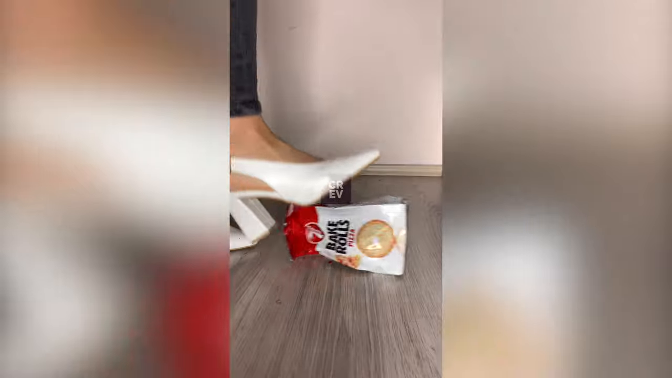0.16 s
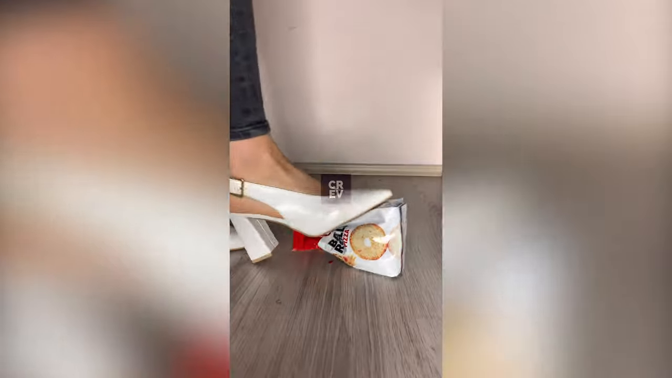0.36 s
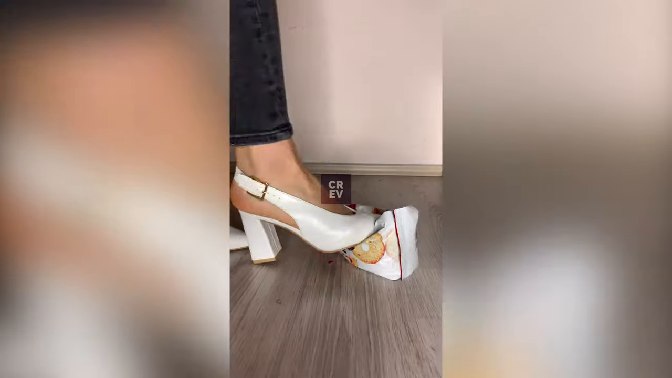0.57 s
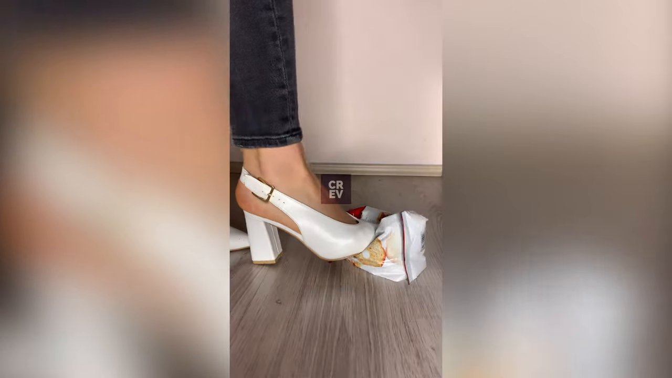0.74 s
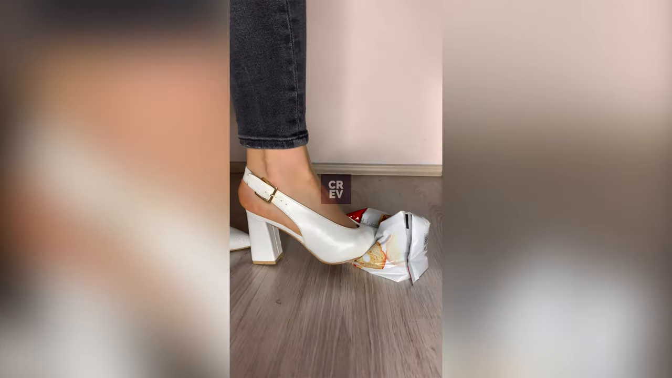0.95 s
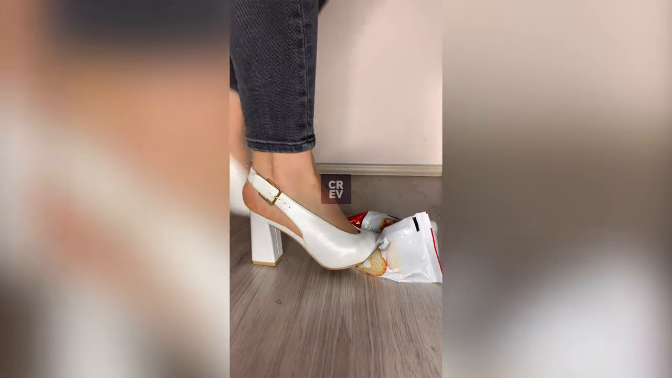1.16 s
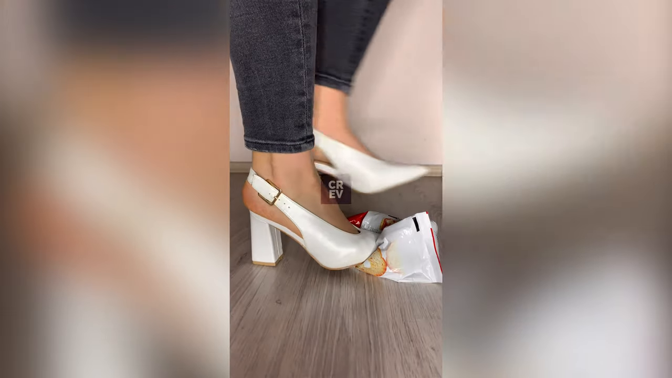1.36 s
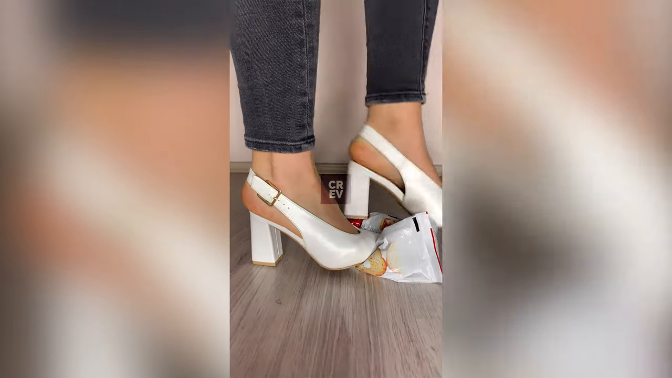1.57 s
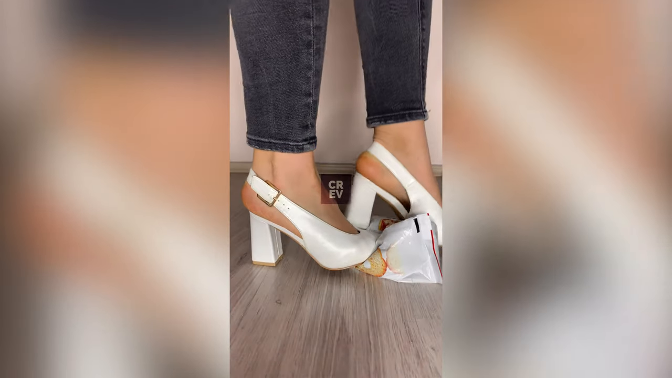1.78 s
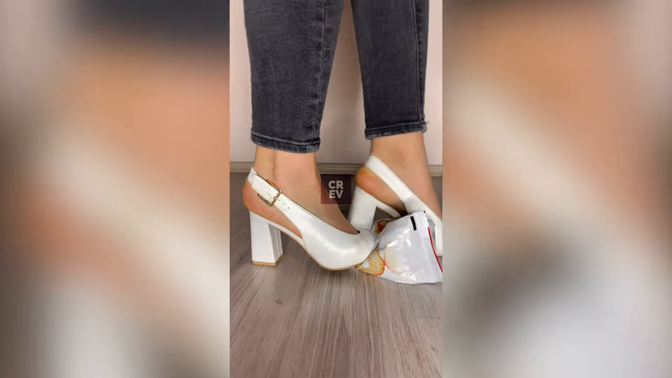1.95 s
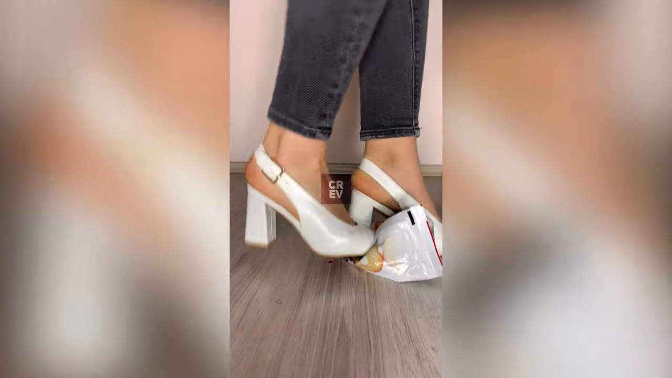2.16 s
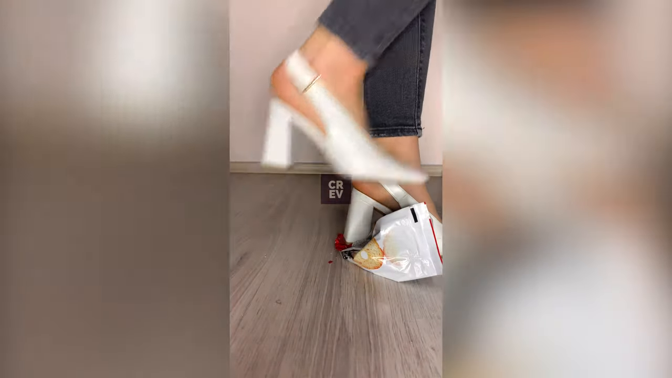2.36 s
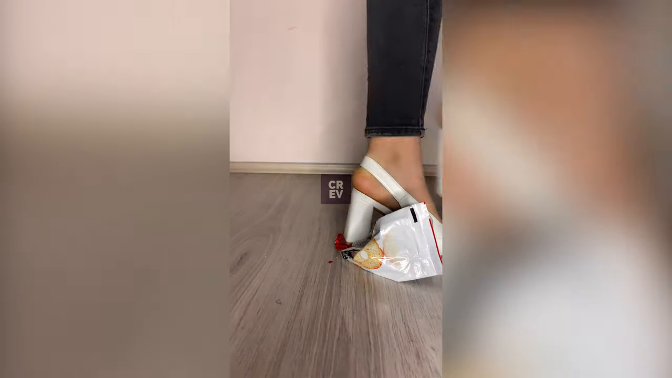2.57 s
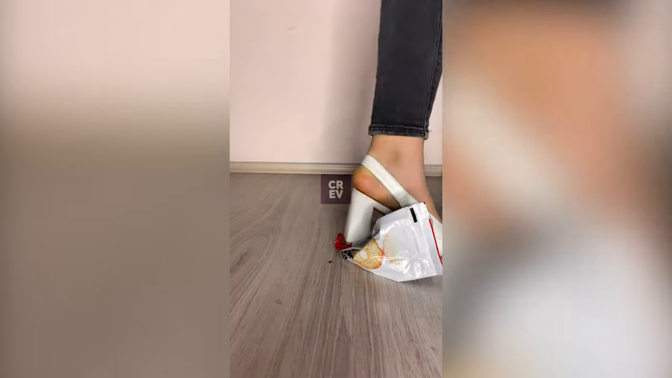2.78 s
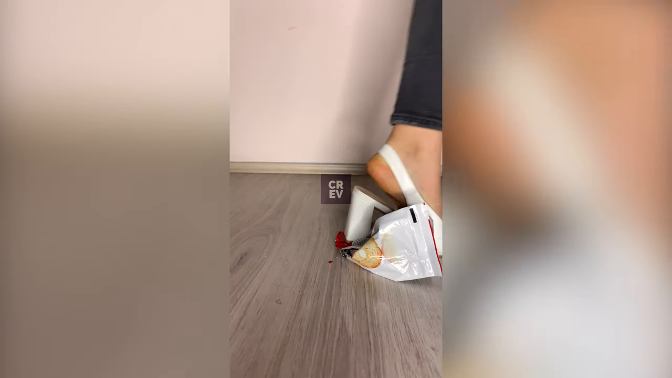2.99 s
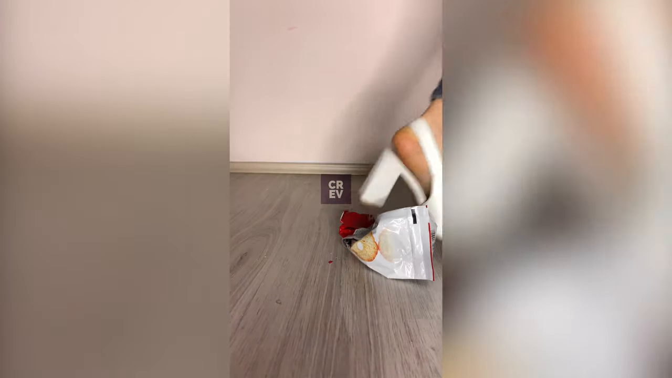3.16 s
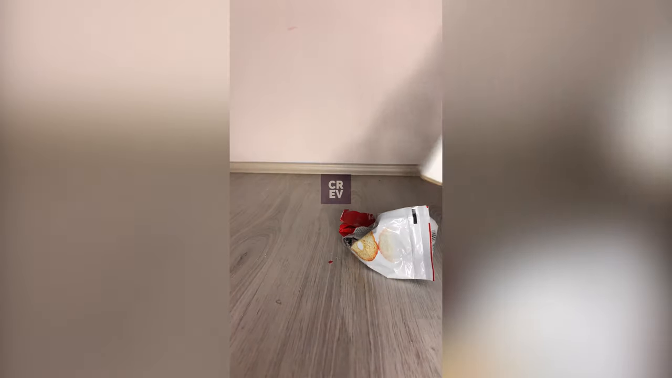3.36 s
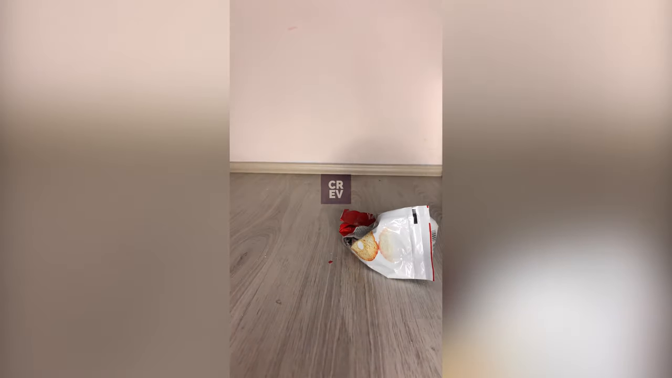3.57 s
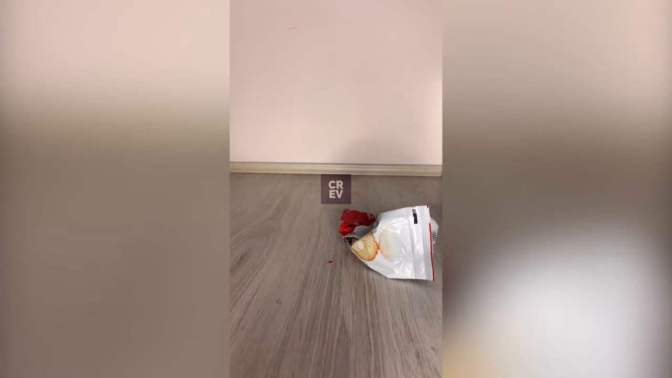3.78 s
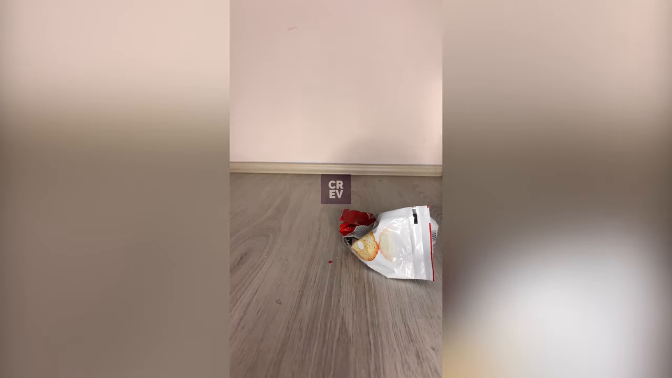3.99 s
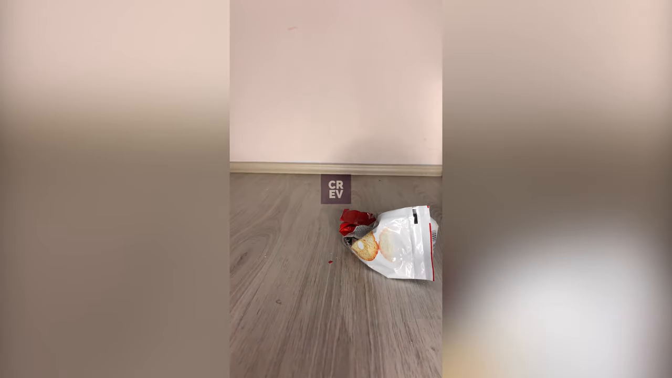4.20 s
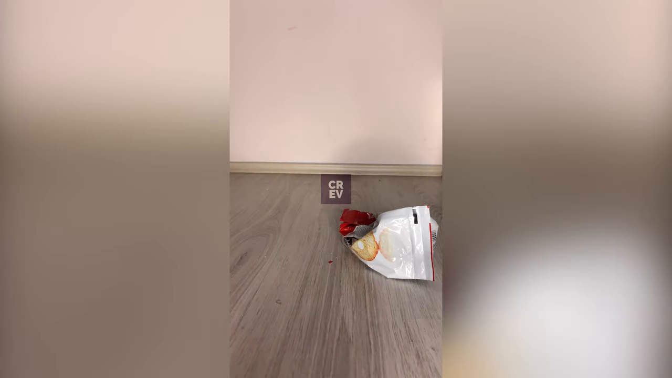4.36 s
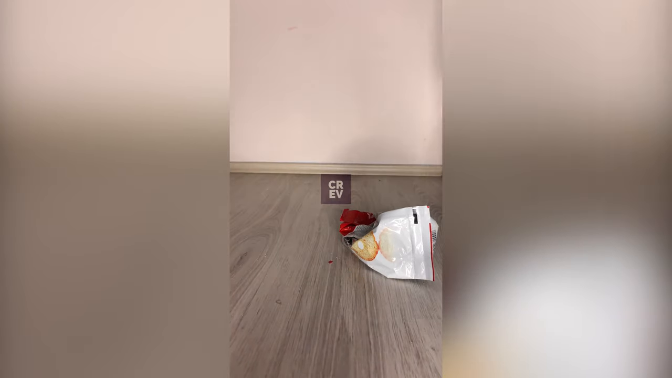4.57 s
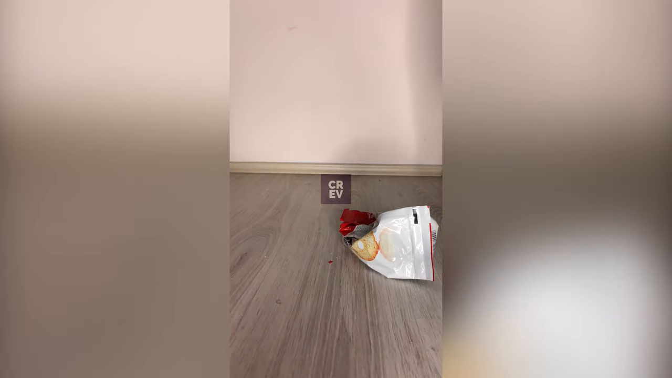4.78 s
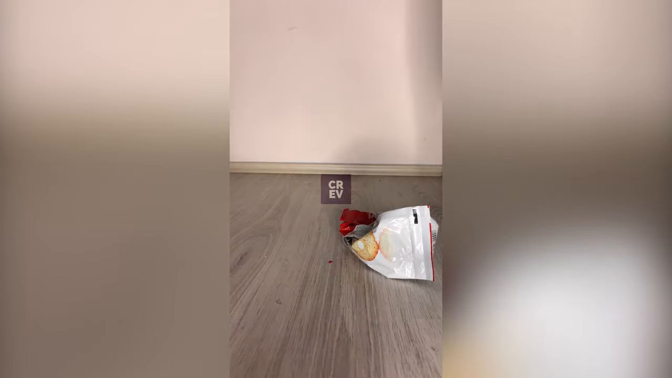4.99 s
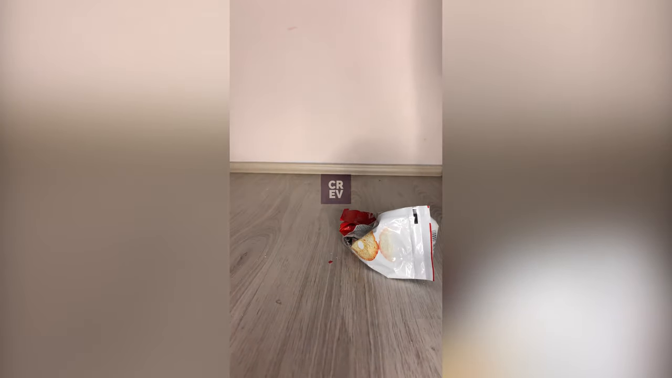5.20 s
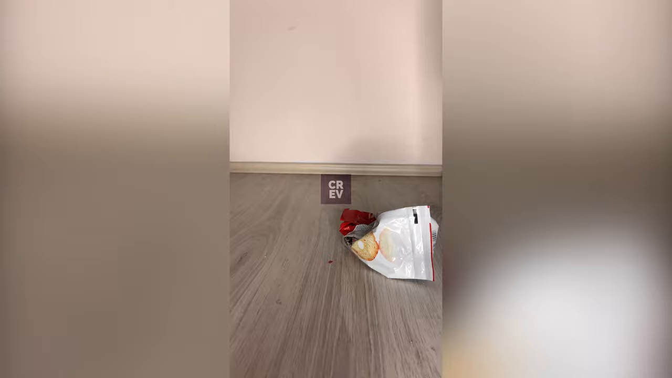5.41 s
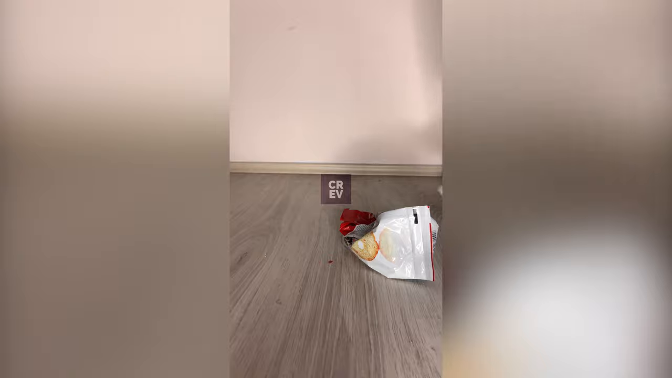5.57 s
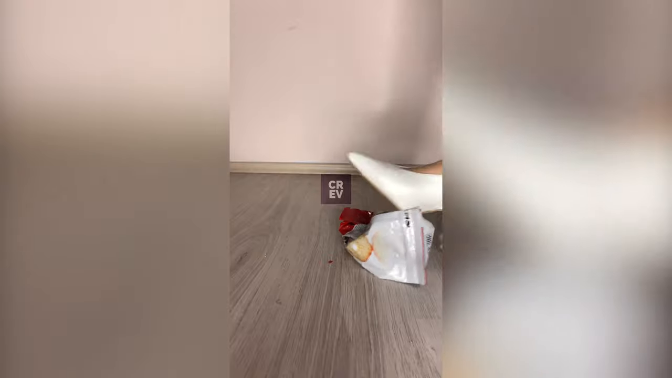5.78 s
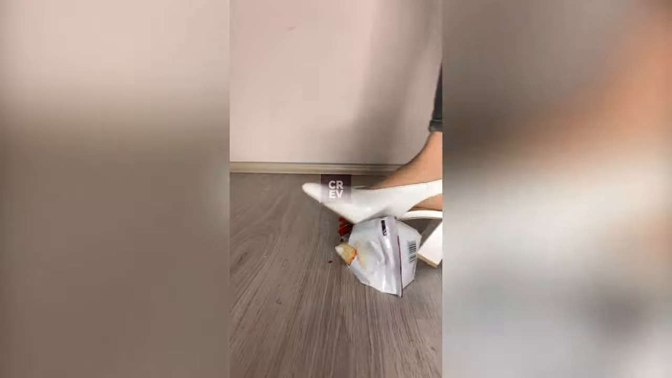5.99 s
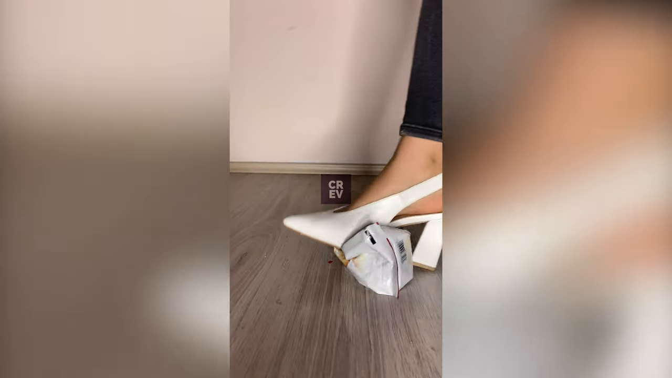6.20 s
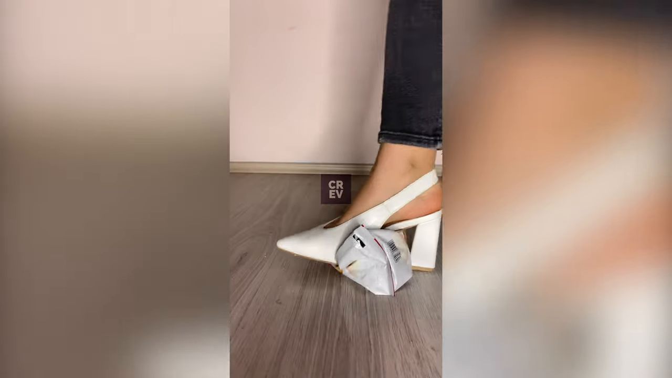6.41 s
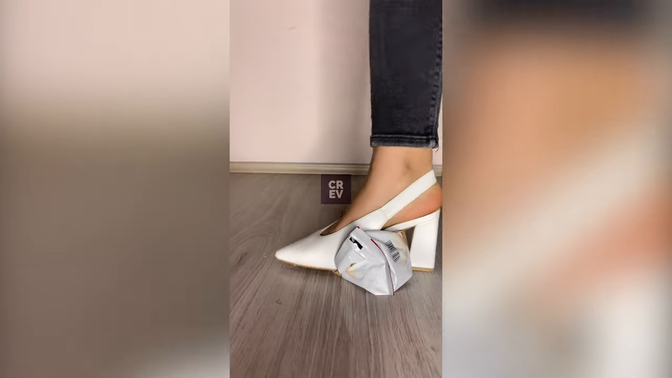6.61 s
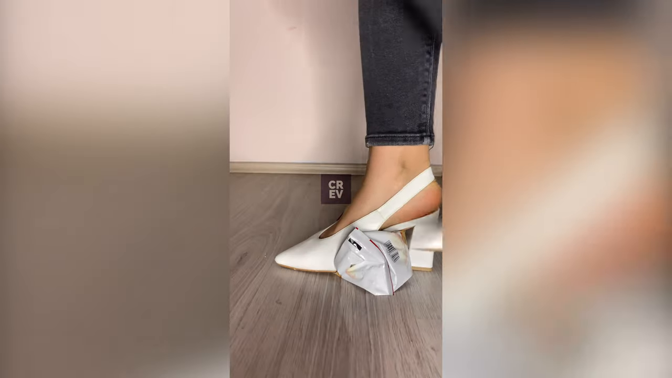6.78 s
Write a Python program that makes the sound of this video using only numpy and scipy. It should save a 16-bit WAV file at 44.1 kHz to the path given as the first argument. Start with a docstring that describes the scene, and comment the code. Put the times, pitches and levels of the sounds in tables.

```python
"""Treading on a bag of crisp bread

Block-heeled shoes tread a foil-lined bag of crisp bread slices on a laminate floor in a small room.
Film and bread crackle as clustered grains, slices snap as noise bursts, heels knock as falling tones.
Between treads the bag unfolds with lone ticks while steps walk off and back.
Reverberation, floor rumble, room noise and a faint hum lie under it; a stereo filter widens the image."""
import sys
import numpy as np
from scipy import signal
from scipy.fft import rfft, irfft, next_fast_len
from scipy.io import wavfile
from scipy.ndimage import uniform_filter1d

SR = 44100
rng = np.random.default_rng(int(sys.argv[2]) if len(sys.argv) > 2 else 0)


def field_ratio(decibels):
    """Amplitude ratio for a level in dB (20 dB per decade); scalars and array-likes work."""
    return 10 ** (np.asarray(decibels, dtype=float) / 20)


def bounce(signal):
    """Save signal as a 16-bit WAV file at the path given by the first command-line argument."""
    frames = np.transpose(np.atleast_2d(signal))
    limited = np.clip(frames, -1, 1)
    pcm = np.round(limited * 32767).astype(np.int16)
    wavfile.write(sys.argv[1], SR, pcm)


N = 302059

# three treads, each (time [s], film crackle [dB], crumbling before the trim in crumbs() [dB re crackle])
TREADS = [
    [(0.086, -63, 7), (0.098, -37, 3), (0.122, -35, 13), (0.166, -35.5, 5.5), (0.222, -42, 13.5),
     (0.23, -27, -0.5), (0.242, -18.5, 3.5), (0.278, -27.5, 6.5), (0.362, -25, 12), (0.378, -27.5, -6),
     (0.63, -21.5, 5), (0.72, -26.5, 7), (0.746, -21.5, 5), (0.894, -34, -1), (0.93, -19, -4.5),
     (1.014, -23, -1), (1.03, -16, -0.5), (1.09, -45, 0.5)],
    [(1.64, -53, 9.5), (1.65, -36, -13), (1.666, -32, 3.5), (1.696, -41.5, 6.5), (1.704, -29, 3),
     (1.792, -21.5, 0), (1.814, -25, -1), (1.968, -21.5, -1), (1.98, -20.5, 7), (1.994, -36, 2),
     (2.012, -33, 3.5), (2.14, -41.5, 2), (2.166, -31, 2.5), (2.176, -36.5, 3), (2.266, -40.5, -3),
     (2.272, -33.5, -7), (2.288, -39, -2), (2.37, -55, 1)],
    [(5.78, -54.5, -7), (5.794, -34, -1), (5.812, -28.5, 0.5), (5.874, -46.5, 1.5), (5.89, -33.5, 4),
     (5.984, -52, 13.5), (6.012, -35.5, 8), (6.092, -50.5, 9), (6.11, -35.5, 8), (6.144, -37.5, 3.5),
     (6.41, -27, 4), (6.52, -36, 1), (6.576, -22, -1.5), (6.69, -31.5, -2), (6.698, -27, 2.5),
     (6.772, -38, -10), (6.784, -35, 2.5), (6.849, -40, -4.5)],
]
# load on the boards, one per tread [dB re untrimmed crumbling]
TREAD_WEIGHT_DB = [-13, -24.5, -15.5]
# treble of the crackle, one per tread [dB re crackle]
TREAD_TREBLE_DB = [-1.5, -1, 1.5]
# bag unfolding between treads, in three stretches: (time [s], film crackle [dB])
UNFOLD = [
    [(1.09, -37), (1.276, -46), (1.348, -55.5), (1.534, -56), (1.64, -51)],
    [(2.37, -59), (2.486, -72.5), (2.684, -71.5), (3.198, -56.5), (3.578, -62.5), (3.73, -80)],
    [(3.73, -57.5), (3.912, -66), (4.408, -69), (4.518, -84.5), (4.786, -64), (5.1, -88)],
]
# treble of the crackle, one per stretch [dB re crackle]
UNFOLD_TREBLE_DB = [-1.5, 0.5, -9.5]
# creases and slices snapping, and dull ticks of steps:
# (time [s], level [dB], treble rms [dB re level], body rms [dB re level], body pitch [Hz])
SNAPS = [(0.101, -15.5, -8.5, -9.5, 810), (0.108, -25.5, -8, -3.5, 810), (0.1278, -18.5, -12, 1, 1070),
         (0.1549, -12.5, -13, -6.5, 1080), (0.2389, 5.5, -9.5, -15.5, 1670), (0.3192, -2, -10, -14, 1460),
         (0.3465, 2.5, -10, -14, 1080), (0.4365, 1, -13.5, -18.5, 1870), (0.4816, -5.5, -7, -14, 1070),
         (0.5207, 0.5, -6.5, -18.5, 1900), (0.5611, 1, -8, -14.5, 674), (0.599, -8.5, -6, -15.5, 931),
         (0.6125, -2.5, -7, -11, 1020), (0.6474, -2.5, -9.5, -12, 1500), (0.6624, -4.5, -10.5, -8.5, 1390),
         (0.7472, 0.5, -9, -11.5, 810), (0.797, -5.5, -12.5, -7.5, 1590), (0.8349, -13, -7.5, -12.5, 1380),
         (0.8506, -12, -9, -11, 690), (0.9113, -8.5, -12, -8.5, 670), (0.9293, -7.5, -13.5, -11.5, 1800),
         (1.0025, -8.5, -15.5, -12.5, 1480), (1.0288, 5, -11.5, -10, 1540), (1.0514, -6.5, -12, -8.5, 1760),
         (1.1497, -23.5, -9, -8, 656), (1.267, -21, -13, -14.5, 1850), (1.287, -26, -16.5, -11, 950),
         (1.3269, -24.5, -8.5, -18.5, 1940), (1.3975, -23, -16, -16, 2030), (1.4209, -28, -12, -17, 1710),
         (1.4424, -37, -13, -10, 2090), (1.483, -24, -10.5, -22, 1470), (1.506, -24.5, -13.5, -18.5, 1480),
         (1.5323, -20.5, -11.5, -13.5, 770), (1.5942, -16, -19.5, -15.5, 1750),
         (1.6329, -37.5, -1.5, -3.5, 1680), (1.65, -17.5, -4.5, -12.5, 1410), (1.6697, -6, -7.5, -18, 1060),
         (1.7064, -8, -7, -20.5, 1170), (1.728, -7, -8, -12.5, 1170), (1.7562, -1, -11.5, -13.5, 1750),
         (1.7719, 0, -11, -16.5, 1210), (1.8777, -2, -9, -22.5, 1380), (1.922, -11.5, -10, -7, 1730),
         (1.9799, -4.5, -12.5, 2, 650), (2.0911, -23, -7.5, -13.5, 690), (2.1628, -7.5, -9, -14.5, 1010),
         (2.236, -20, -10.5, -12, 673), (2.2737, -15, -11.5, -18, 1010), (2.3193, -21, -9.5, -11, 1000),
         (2.3968, -19, -8, -11.5, 1400), (2.4603, -37.5, -5.5, -6.5, 781), (2.4823, -32, -9.5, -11, 1000),
         (2.576, -36.5, -7, -16.5, 740), (2.6019, -35, -6.5, -25.5, 1410), (2.6419, -25, -10.5, -15, 2050),
         (2.709, -43.5, -7.5, -4.5, 1510), (2.7814, -18, -17.5, -14.5, 2190),
         (2.9247, -27.5, -7, -4.5, 1160), (2.9362, -13.5, -13.5, -8, 1800), (2.9578, -28.5, -14.5, -2, 598),
         (3.0106, -30, -6, -17, 1430), (3.038, -17.5, -13.5, -19, 1510), (3.0846, -23.5, -12, -7.5, 1030),
         (3.1181, -14, -10, -15.5, 1420), (3.215, -23.5, -11.5, -20, 1450), (3.2928, -11, -16, -19.5, 1810),
         (3.3379, -23, -11.5, -18.5, 1920), (3.357, -24.5, -12, -9, 1380),
         (3.4921, -26, -11.5, -18.5, 1500), (3.5301, -23, -16, -12.5, 1780), (3.5397, -30, -11, -4.5, 1670),
         (3.6385, -26, -11, -14, 1820), (3.7436, -14.5, -28, -5, 646), (3.8812, -27.5, -20, -11.5, 1980),
         (3.9613, -35, -21.5, -3.5, 1430), (3.9762, -35, -14.5, -7, 1830), (4.0927, -47, -13.5, 1, 996),
         (4.1485, -29.5, -20, -9.5, 1800), (4.2182, -41, -22.5, 0.5, 950),
         (4.2857, -37.5, -22.5, 0.5, 1810), (4.3094, -22.5, -22, -9, 660), (4.4559, -29, -11.5, -6.5, 1010),
         (4.4674, -23, -17.5, -13, 907), (4.556, -36, -19.5, -7.5, 1940), (4.6717, -46, -11, -6, 1030),
         (4.6844, -34.5, -19.5, -10.5, 2000), (4.8019, -18.5, -26, -12.5, 690),
         (5.1155, -36, -14.5, -20.5, 1380), (5.2839, -37.5, -14.5, -0.5, 876), (5.4939, -42, -9, -6, 1200),
         (5.7941, -8, -8.5, -25, 1390), (5.8134, -8.5, -10.5, -12, 1390), (5.8907, -15, -11.5, -12.5, 990),
         (5.9197, -13.5, -13.5, -11, 710), (6.0142, -9.5, -10.5, -23.5, 2060),
         (6.056, -17, -12.5, -5, 1050), (6.0956, -20.5, -0.5, -2.5, 1190), (6.111, -4, -10.5, -19, 1010),
         (6.1265, -12.5, -6.5, -11, 1220), (6.1479, -14.5, -12, -16.5, 2030),
         (6.2242, -11.5, -6, -12.5, 1350), (6.2494, -11.5, -7.5, -12.5, 1000),
         (6.2887, -12, -8, -12.5, 1840), (6.3079, -4, -6.5, -16, 1410), (6.5314, -13.5, -5, -14, 1210),
         (6.559, -6.5, -7, -13.5, 1000), (6.5983, -9.5, -10.5, -13, 650), (6.6367, -10.5, -8, -11.5, 1380),
         (6.699, -7, -9, -15.5, 2040), (6.7104, -4.5, -10, -23, 1080), (6.7872, -4.5, -11, -17, 990),
         (6.8194, -10, -12, -21, 651)]
# heels and soles landing, slices giving way: (time [s], level [dB], nominal pitch [Hz], t60 [s])
KNOCKS = [(0.232, -10.5, 370, 0.023), (0.317, -10, 750, 0.017), (0.333, -4, 482, 0.039),
          (0.556, -10, 431, 0.05), (0.615, -7, 307, 0.035), (0.74, -5.5, 666, 0.028),
          (0.848, -15.5, 465, 0.044), (0.952, -15, 590, 0.021), (1.046, -6, 382, 0.049),
          (1.534, -32.5, 780, 0.053), (1.664, -23.5, 477, 0.035), (1.75, -23.5, 395, 0.035),
          (1.864, -14, 705, 0.028), (2.245, -20.5, 623, 0.056), (2.846, -13.5, 518, 0.039),
          (3.353, -34.5, 168, 0.0345), (3.74, -22, 672, 0.044), (4.228, -42, 261, 0.035),
          (4.338, -23, 333, 0.035), (4.783, -25.5, 366, 0.012), (4.81, -26.5, 255, 0.024),
          (5.23, -38, 319, 0.064), (5.285, -28, 280, 0.0322), (5.357, -26.5, 262, 0.023),
          (5.49, -47.5, 466.4, 0.033), (5.787, -19.5, 334, 0.024), (5.903, -10, 720, 0.03),
          (6.104, -22, 860, 0.024), (6.225, -22.5, 660, 0.037), (6.355, -21.5, 790, 0.05),
          (6.687, -14, 760, 0.018)]
# stamps, and two small short knocks leading into the second one, all as falling sweeps: (time [s], level [dB],
# start of the sweep [Hz], fall time [s], blow on the boards [dB])
STAMPS = [(1.0372, 1, 550, .0042, -22), (1.9715, -7, 700, .002, -40), (1.9770, -1, 700, .002, -36),
          (1.9811, 2, 570, .0040, -23)]
# scuffs of soles, bursts of rustle and low rumbles:
# (start [s], length [s], dull grains before the trim in crumbs() [dB], rumble [dB], crackle [dB])
BURSTS = [(0.0, 0.054, -81, -65.5, -64), (2.546, 0.024, -67.5, -55, -71), (2.83, .17, -45, -41, -54.5),
          (3.035, .18, -38.5, -51, -41.5), (3.354, 0.038, -67, -69, -49), (3.726, .14, -41.5, -47.5, -62),
          (4.212, .09, -54, -49, -63), (4.326, .12, -46, -45.5, -69), (4.448, .08, -55, -57, -58),
          (4.778, 0.067, -40.5, -39.5, -56), (4.878, 0.053, -51, -48.5, -50.5),
          (5.223, 0.056, -50, -50.5, -66.5), (5.292, .12, -44.5, -46, -88),
          (5.451, 0.062, -58, -58.5, -63.5), (5.651, 0.12, -79, -66, -90), (6.547, 0.26, -60, -42.5, -63)]
# modes of the floor and the air above it: (frequency [Hz], level [dB], t60 [s])
BOARDS = [(57, -7, .85), (92, -13, .3), (143, -11, .3), (172, -9, .18), (206, 1, .7), (275, -9, .26),
          (318, -10, .45), (458, -7, .13)]
# spectrum of the film crackle: (frequency [Hz], level [dB])
FILM = [(300, -21), (900, -4.5), (2000, -1.5), (4000, -1.5), (7000, 0), (10000, -1), (13000, -1.5),
        (15500, -2.5), (16300, -31.5)]
# spectrum of breaking bread: (frequency [Hz], level [dB])
CRUMB = [(120, -25), (300, -2), (600, 2.5), (1200, 2), (1900, 3), (2600, -16.5), (5000, -53)]
# body spectrum of a snap pitched at SLICE_HZ: (frequency [Hz], level [dB])
SLICE = [(200, -20), (550, -11.5), (1000, 3), (1500, -11.5), (2600, -13), (5000, -30.5)]
# spectrum of the boards flexing: (frequency [Hz], level [dB])
WEIGHT = [(20, -13.5), (45, -23), (57, -8), (70, 4), (140, 4), (220, 1.5), (320, 4), (600, -36.5)]
# reverberation: (frequency [Hz], t60 [s])
ROOM = [(100, 0.053), (250, 0.28), (700, 0.12), (2000, .2), (5000, 0.2), (12000, 0.15)]
# spectrum of the room noise: (frequency [Hz], level [dB])
QUIET = [(18, -27), (30, 7), (119, 3.5), (439, -26.5), (3690, -29.5), (4990, -37.5), (8030, -21.5),
         (9820, -33.5), (12000, -24.5), (15600, -45), (22000, -120)]
# spectrum of the hum: (frequency [Hz], level [dB])
HUM = [(40, -41), (51, -7), (57, 2.5), (65, -6), (85, -40.5)]
# stereo filter: (frequency [Hz], phase of left ahead of right [rad], channel likeness before widening [0-1])
STEREO = [(0, 0, .99), (250, -.25, .97), (800, -.9, .8), (1500, 0, .9), (2200, 1.4, .65), (2900, 2.8, .2),
          (3800, 2.2, .25), (4800, 3.14, .7), (5800, 4.9, .65), (6600, 6.1, .92), (7500, 6.45, .95),
          (8400, 7.9, .75), (9200, 9.25, .985), (10200, 9.6, .985), (11000, 11, .75), (11800, 12.3, .93),
          (13000, 12.85, .93), (13800, 14.1, .75), (14500, 15.4, .95), (15600, 15.85, .98), (22050, 22, .9)]

TREBLE_HZ, DULL_HZ, SLICE_HZ = 5500, 1200, 1000
UNFOLD_CRUMB_DB = 0.5  # loose crumbs shifting, re crackle, before the trim in crumbs()
FLURRY_DB, FLURRY_T60_S = -33, 0.078  # short run of crackle after each snap, re its level
FLURRY_TREBLE_DB, BURST_TREBLE_DB = -7.5, -1.5  # re their crackle
BURST_RISE_S, BURST_SAG_DB, BURST_RELEASE_DB_PER_S = 0.01, -6, 301.5
THUD_DB, THUD_T60_S = -27.5, 0.77  # rumble after each knock, re its level
STAMP_THUD_DB, STAMP_THUD_T60_S = -30.5, 0.63
FLEX_RING_DB = -7.5  # ringing modes in the rumble
QUIET_DB, HUM_DB = -75, -71


def evened(x):
    """Scales to rms 1."""
    return x / np.sqrt(np.mean(x ** 2) + 1e-20)


def read(points, hz):
    """Reads a spectrum table on a log frequency axis."""
    f, value = np.transpose(points)
    return np.interp(np.log(hz + 1), np.log(f + 1), value)


def colour(x, points):
    """Filters by a spectrum table."""
    gain = field_ratio(read(points, np.fft.rfftfreq(len(x), 1 / SR)))
    return irfft(rfft(x) * gain, len(x))


def split(x, hz):
    """Parts below and above hz."""
    low = signal.sosfilt(signal.butter(4, hz, fs=SR, output="sos"), x)
    high = signal.sosfilt(signal.butter(4, hz, "high", fs=SR, output="sos"), x)
    return low, high


def add(mix, s, sound):
    """Mixes a sound in at time s."""
    part = mix[round(s * SR):][:len(sound)]
    part += sound[:len(part)]


def curve(table, column):
    """Power of a control curve, its dB columns summed up to column; silent outside its span."""
    rows = np.array(table)
    db = rows[:, 1:column + 1].sum(1)
    return field_ratio(2 * np.interp(np.arange(N) / SR, rows[:, 0], db, -150, -150))


def aftermath(events, db, t60_s):
    """Power that jumps at each event and dies away exponentially."""
    kicks = np.zeros(N)
    for row in events:
        add(kicks, row[0], field_ratio([2 * (row[1] + db)]))
    return abs(signal.lfilter([1], [1, -field_ratio(-120 / t60_s / SR)], kicks))


def bursts(column):
    """Power of the scuffs, rustles and rumbles: each rises, sags over its length, then lets go."""
    out, t = np.zeros(N), np.arange(SR // 2) / SR
    for row in BURSTS:
        start_s, length_s = row[:2]
        sag_db = BURST_SAG_DB * np.minimum(t / length_s, 1)
        release_db = BURST_RELEASE_DB_PER_S * np.maximum(t - length_s, 0)
        rise = np.minimum(t / BURST_RISE_S, 1)
        add(out, start_s, (rise * field_ratio(row[column] + sag_db - release_db)) ** 2)
    return out


def pressure():
    """Gains of crackle, its treble, crumbling and load: powers of all their causes summed."""
    unfolding = [curve(table, column=1) for table in UNFOLD]
    parts = [curve(table, column=1) for table in TREADS] + unfolding
    parts += [aftermath(SNAPS, FLURRY_DB, FLURRY_T60_S), bursts(column=4)]
    treble_db = TREAD_TREBLE_DB + UNFOLD_TREBLE_DB + [FLURRY_TREBLE_DB, BURST_TREBLE_DB]
    treble = sum(field_ratio(2 * db) * power for db, power in zip(treble_db, parts))

    crushed = [curve(table, column=2) for table in TREADS]
    crumbling = sum(crushed) + field_ratio(2 * UNFOLD_CRUMB_DB) * sum(unfolding) + bursts(column=2)

    load = sum(field_ratio(2 * db) * power for db, power in zip(TREAD_WEIGHT_DB, crushed))
    load += bursts(column=3)
    load += aftermath(KNOCKS, THUD_DB, THUD_T60_S)
    load += aftermath(STAMPS, STAMP_THUD_DB, STAMP_THUD_T60_S)
    return np.sqrt([sum(parts), treble, crumbling, load])


def grains(slips, per_s, spread_db, lo_hz, hi_hz, cycles, clump, count=24):
    """Tiny fractures bunched at the slips, each a few dying cycles at its own pitch; a few are large."""
    bunch = np.exp(clump * slips)
    size = field_ratio(spread_db * np.minimum(rng.exponential(1, N), 5)) * rng.choice([-1, 1], N)
    size *= rng.random(N) < per_s / SR * bunch / bunch.mean()
    kind = rng.integers(0, count, N)
    t, out = np.arange(1024) / SR, np.zeros(N)
    for k, hz in enumerate(np.geomspace(lo_hz, hi_hz, count)):
        ring = np.exp(-t * hz / cycles) * np.sin(2 * np.pi * hz * t)
        out += signal.oaconvolve(size * (kind == k), ring * np.sqrt(hz))[:N]
    return out


def film(slips, level, treble_level):
    """Dense crackle of the foil: creases give way as short grains, treble levelled on its own."""
    crackle = grains(slips, per_s=2500, spread_db=4.0, lo_hz=960, hi_hz=13900, cycles=0.92, clump=0.89)
    low, treble = split(colour(crackle, FILM), TREBLE_HZ)
    return level * evened(low) + treble_level * evened(treble)


def crumbs(slips, level, crackle):
    """Duller grains of bread breaking; where the foil crackles little, only the dull part is left."""
    crunch = grains(slips, per_s=1600, spread_db=2.5, lo_hz=253.5, hi_hz=2540, cycles=1.7, clump=1.0)
    low, high = split(evened(colour(crunch, CRUMB)), DULL_HZ)
    crisp = np.minimum(field_ratio(5.0) * crackle / level, 1)
    return field_ratio(-4) * level * (low + crisp * high)


def snaps():
    """Each snap or tick: a very short treble tick, a slightly longer crack, and a lower, slower body."""
    out, t = np.zeros(N), np.arange(1024) / SR
    noise = rng.standard_normal((len(SNAPS), 2, 1024))
    tick_shape = (np.exp(-t / 0.00019) + 0.051 * np.exp(-t / 0.005)) * (1 - np.exp(-t / 0.00035))
    crack_shape = (np.exp(-t / 0.00081) + 0.03 * np.exp(-t / 0.012)) * (1 - np.exp(-t / 0.0011))
    body_shape = np.exp(-t / 0.0031) * (1 - np.exp(-t / 0.00038))
    first = t < .0025  # the stretch over which rms counts
    for (s, db, treble_db, body_db, hz), (film_noise, body_noise) in zip(SNAPS, noise):
        low, treble = split(colour(film_noise, FILM), TREBLE_HZ)
        crack, tick = crack_shape * low, tick_shape * treble
        body_spectrum = [(f * hz / SLICE_HZ, part_db) for f, part_db in SLICE]
        body = body_shape * colour(body_noise, body_spectrum)
        snap = 0.38 * crack / abs(crack).max()
        snap += field_ratio(treble_db) * tick / tick[first].std()
        snap += field_ratio(body_db) * body / body[first].std()
        add(out, s, field_ratio(db) * snap)
    return out


def knocks():
    """A knock starts high and drops in a few ms, as bending waves spread; a bounce and a rattle follow."""
    out, blows, t = np.zeros(N), np.zeros(N), np.arange(6144) / SR
    for (s, db, hz, t60_s), noise in zip(KNOCKS, rng.standard_normal((len(KNOCKS), 6144))):
        # pitch falls from about 2 to 0.8 times nominal
        turns = hz * (.8 * t + 1.3 * .002 * (1 - np.exp(-t / 0.0021)))
        fall_db = -60 * t / t60_s
        knock = field_ratio(db + fall_db) * (1 - np.exp(-t / 0.00086)) * np.sin(2 * np.pi * turns)
        rattle_spectrum = [(60, -20), (0.9 * hz, 0), (0.69 * hz, -3), (1.66 * hz, -13), (9000, -60)]
        rattle = evened(colour(noise, rattle_spectrum))
        rattle *= field_ratio(db - 9 + fall_db / 4.3) * (1 - np.exp(-t / 0.00093))
        add(out, s + 0.00477, knock + rattle)
        add(out, s + 0.011 + .002 * noise[0], -.4 * knock)  # bounce, randomly timed
        add(blows, s + .0045, field_ratio([db - 35.0]))
    return out + boards(blows)


def stamps():
    """The sole slaps air and boards: a falling sweep of one to two turns, then the boards ring on."""
    out, blows = np.zeros(N), np.zeros(N)
    for s, db, start_hz, fall_s, ring_db in STAMPS:
        u = np.arange(round(6 * fall_s * SR)) / SR / fall_s
        turns = start_hz * fall_s * (1 - np.exp(-u))
        shape = np.minimum(.6 + u, 1) * np.exp(-np.maximum(u - 1, 0) / .9)
        add(out, s, field_ratio(db) * shape * np.sin(2 * np.pi * turns))
        add(blows, s + fall_s, field_ratio([ring_db]))
    return out + boards(blows)


def boards(blows):
    """The floor rings in its modes after each blow."""
    t = np.arange(SR) / SR
    ring = sum(field_ratio(db - 60 * t / t60_s) * np.sin(2 * np.pi * hz * t) for hz, db, t60_s in BOARDS)
    return signal.oaconvolve(blows, ring)[:N]


def weight(load):
    """Low rumble of the boards flexing under shifting weight, their modes stirred by noise."""
    flex, stir = rng.standard_normal((N, 2)).T
    return load * (evened(colour(flex, WEIGHT)) + field_ratio(FLEX_RING_DB) * evened(boards(stir)))


def sparse_tail(start, length):
    """Echo taps of random sign, one in every 20 samples, from sample start on."""
    taps = np.zeros(length)
    at = np.arange(start, length - 20, 20)
    taps[at + rng.integers(0, 20, len(at))] = rng.choice([-1., 1.], len(at))
    return taps


def room(x):
    """Reverberation, each band dying at its own speed; three tails take turns as the sources shift about."""
    out, turn = np.zeros(N), 2 * np.pi * 2.3 * np.arange(N) / SR
    for k in range(3):
        hz, t, z = signal.stft(sparse_tail(start=120, length=SR // 2), SR, nperseg=256)
        decay = field_ratio(-60 * t / read(ROOM, hz)[:, None])
        tail = signal.istft(z * decay, SR, nperseg=256)[1]
        window = np.sqrt(2 / 3) * np.cos(turn + k * np.pi / 3)
        out += signal.oaconvolve(x * window, tail / np.linalg.norm(tail))[:N]
    return out


def quiet():
    """Steady room noise: coloured Gaussian noise."""
    return field_ratio(QUIET_DB) * evened(colour(rng.standard_normal(N), QUIET))


def hum():
    """Faint wavering hum: noise in a narrow low band."""
    return field_ratio(HUM_DB) * evened(colour(rng.standard_normal(N), HUM))


def scene():
    """All sources in the room, the same in both channels."""
    # the load gives way in jerks of a few ms
    slips = evened(uniform_filter1d(rng.standard_normal(N), size=200))
    crackle, treble, crumbling, load = pressure()
    bag = film(slips, crackle, treble) + crumbs(slips, crumbling, crackle)
    cracks = snaps()
    feet = knocks() + stamps()
    reverberation = room(field_ratio(-3) * bag + field_ratio(-6) * cracks + field_ratio(-23.0) * feet)
    air = bag + cracks + feet + reverberation + weight(load) + quiet() + hum()
    return np.array([air, air])


def low_pass(x):
    """Removes everything above the highest recorded frequency."""
    return signal.sosfilt(signal.butter(12, 15720, fs=SR, output="sos"), x)


def record(dry):
    """Stereo filter: set phase difference and likeness per frequency, a phase-randomised copy widening
    the image; loud peaks round off at full scale."""
    size = next_fast_len(N + 2048)
    f, lead, same = np.transpose(STEREO)
    hz = np.fft.rfftfreq(size, 1 / SR)
    lead, share = np.interp(hz, f, lead), np.arccos(np.interp(hz, f, same)) / 2
    z = signal.stft(dry[0], nperseg=128, noverlap=64)[2]
    z = z * np.exp(2j * np.pi * rng.random(z.shape))
    randomised = signal.istft(z, nperseg=128, noverlap=64)[1][:N]
    direct, other = rfft(dry[0], size), field_ratio(4.0) * rfft(randomised, size)
    left = (np.cos(share) * direct + np.sin(share) * other) * np.exp(.5j * lead)
    right = (np.cos(share) * direct - np.sin(share) * other) * np.exp(-.5j * lead)
    stereo = irfft(np.array([left, right]), size)[:, :N]
    rounded = stereo / (1 + abs(stereo) ** 6) ** (1 / 6)
    return low_pass(rounded)


dry = scene()
out = record(dry)
bounce(out)
```